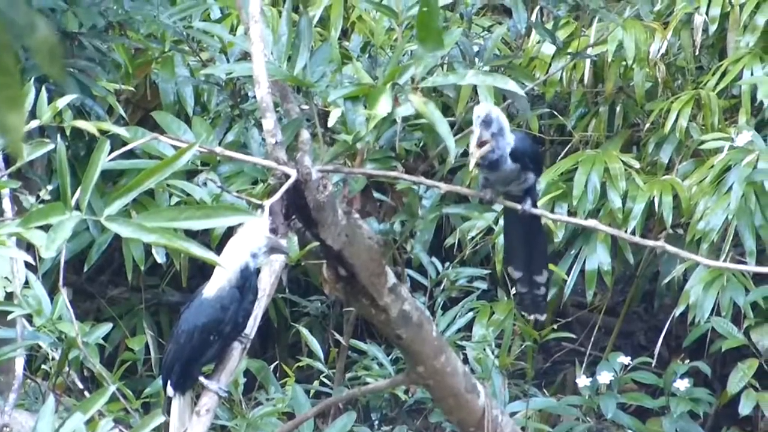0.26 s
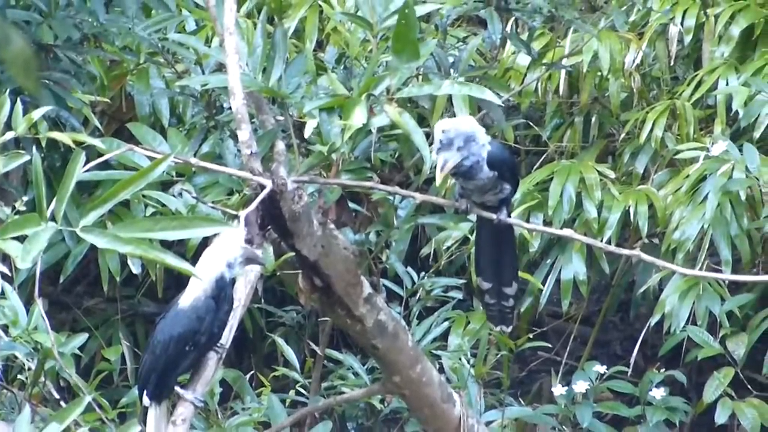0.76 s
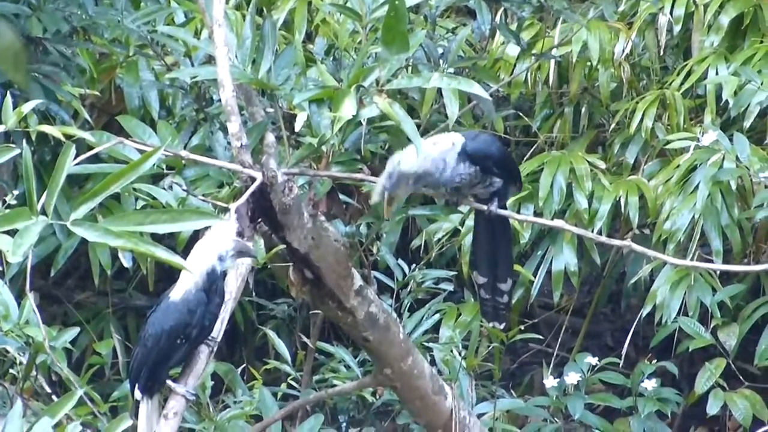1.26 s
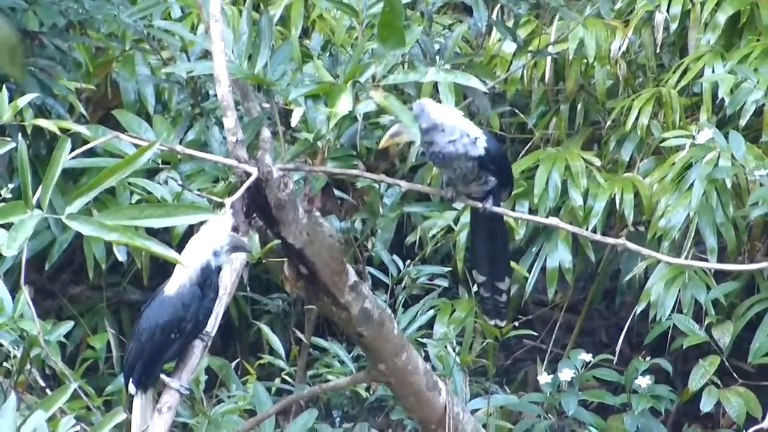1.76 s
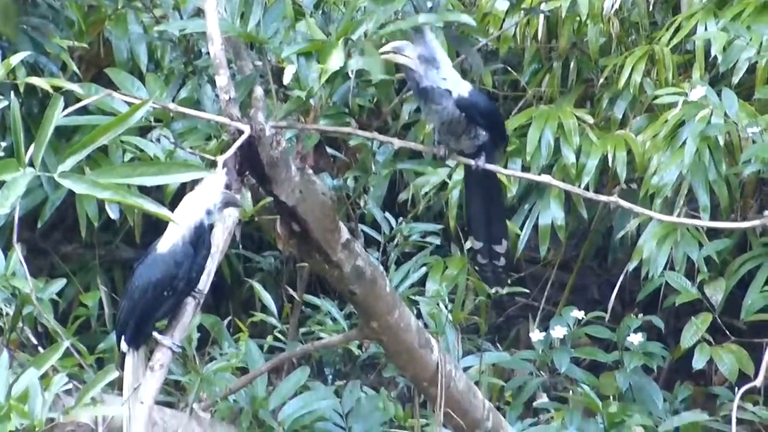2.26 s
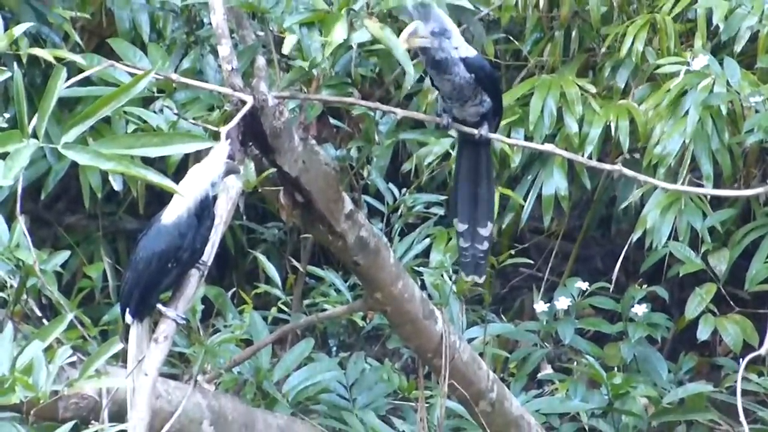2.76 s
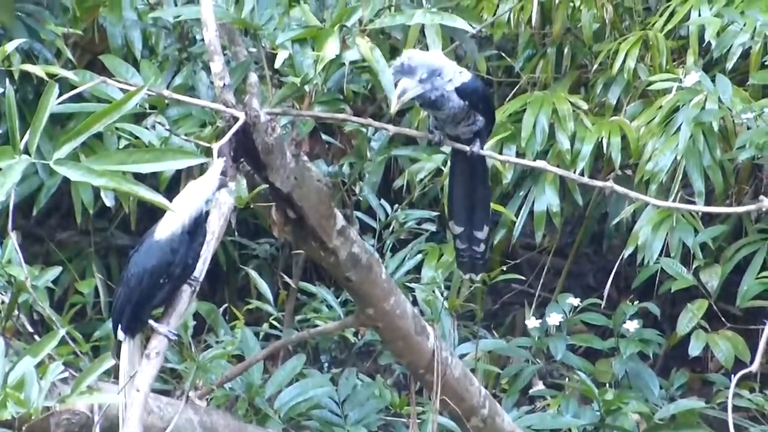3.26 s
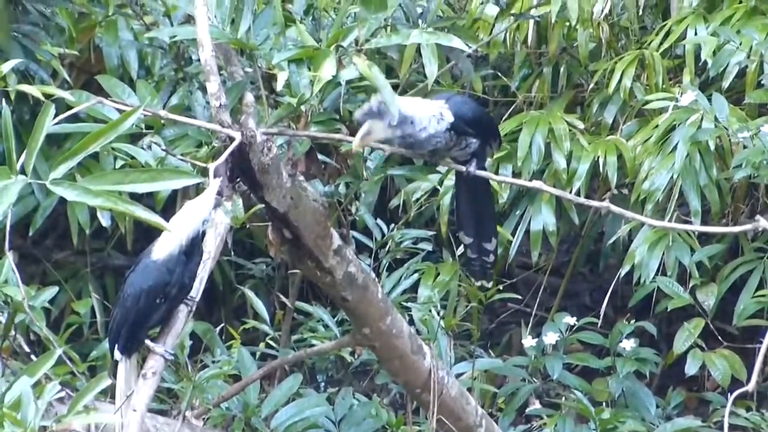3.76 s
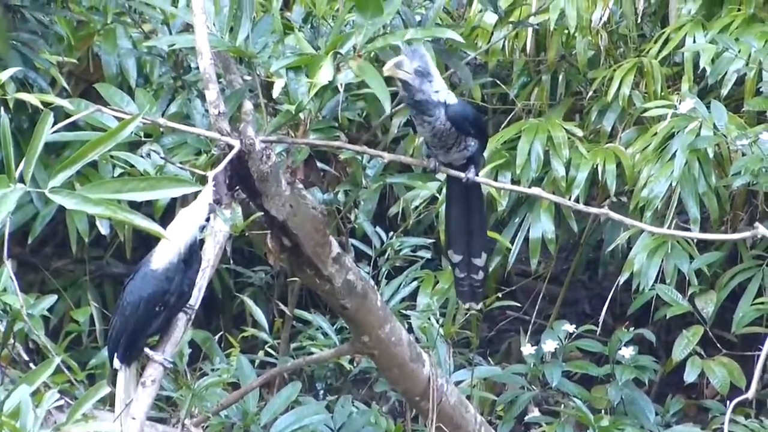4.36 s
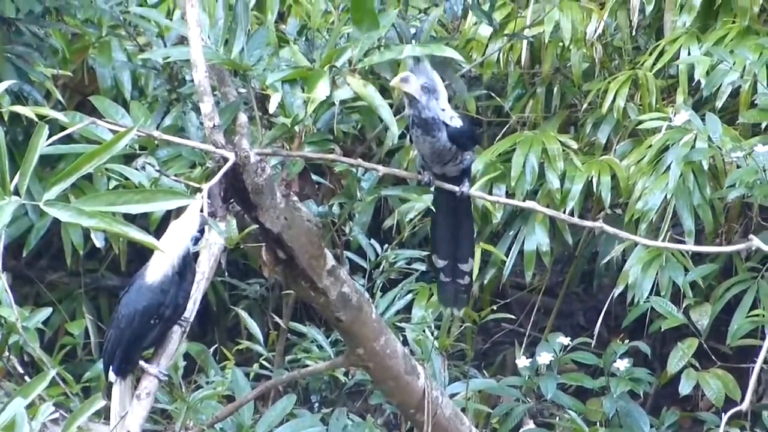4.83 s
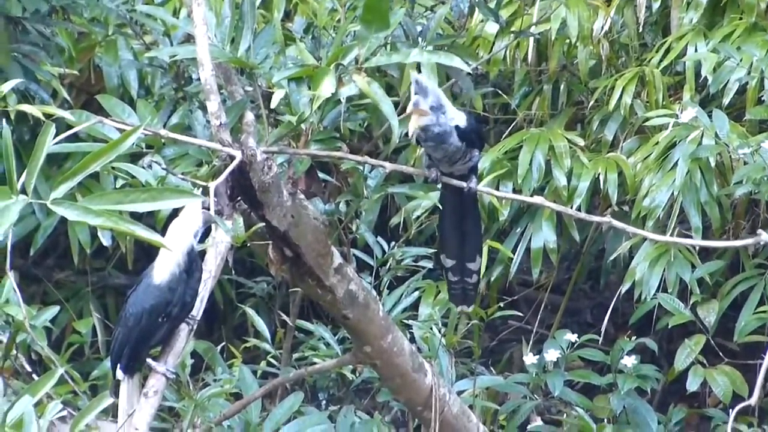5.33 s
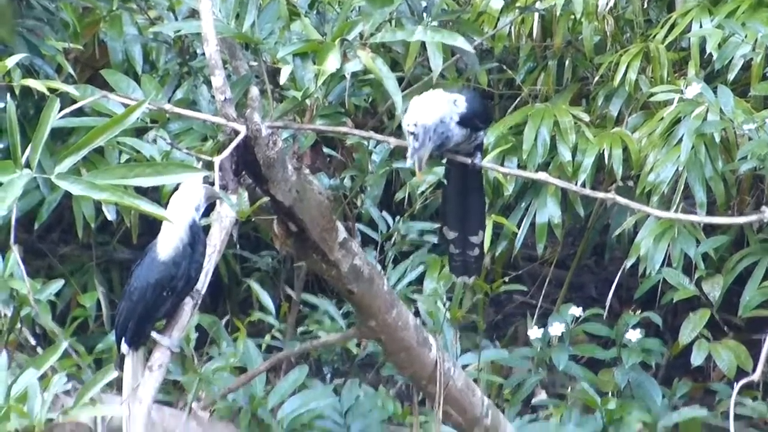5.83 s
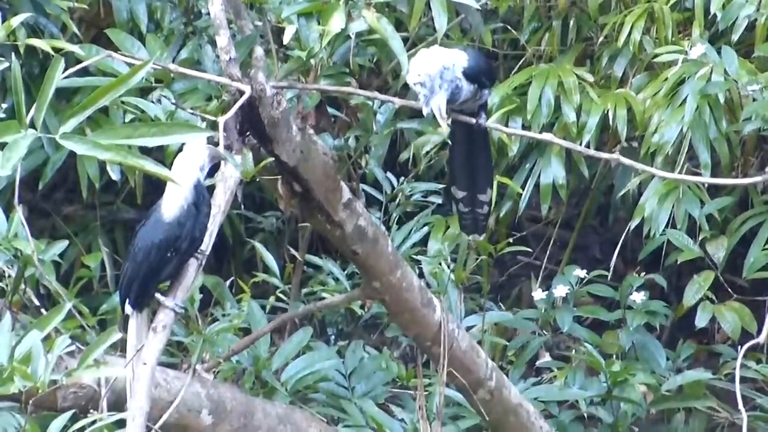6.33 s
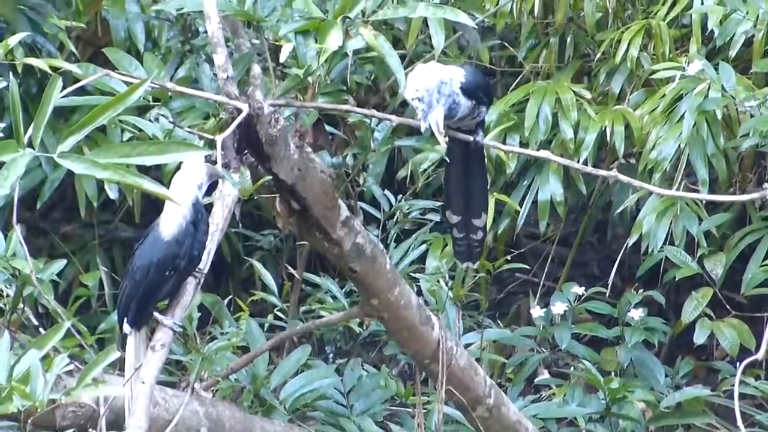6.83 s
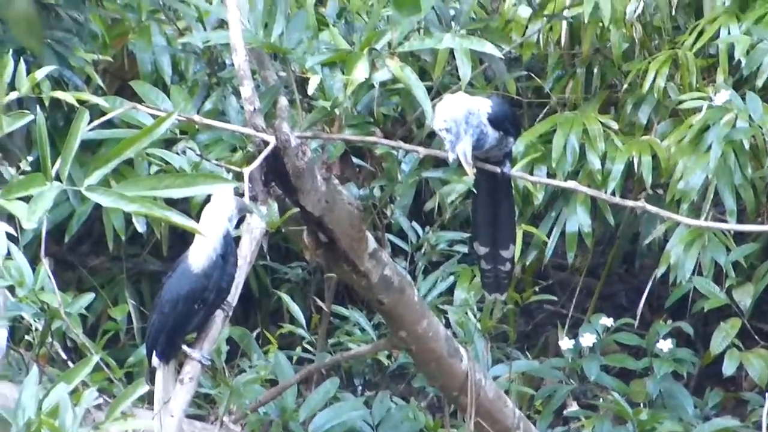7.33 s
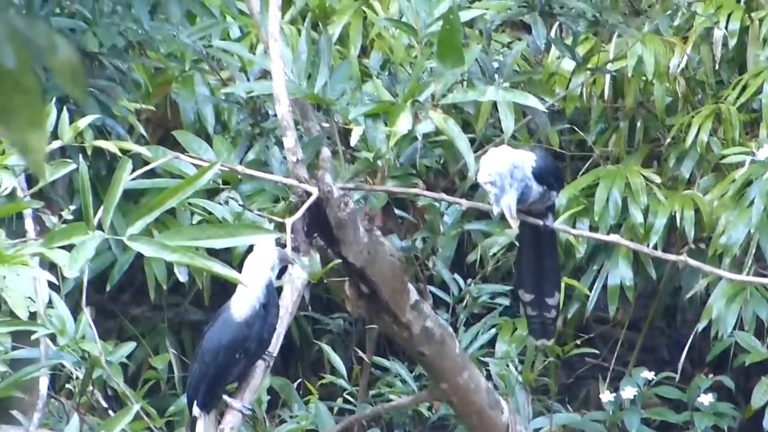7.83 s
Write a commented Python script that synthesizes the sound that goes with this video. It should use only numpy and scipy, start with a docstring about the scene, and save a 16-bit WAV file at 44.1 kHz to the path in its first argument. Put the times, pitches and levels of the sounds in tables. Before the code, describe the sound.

Wavering high cicada tones and dry buzzing run without pause, with short plunging bird chirps in pairs over soft low air.

```python
"""Cicadas whine on wavering tones near 5.6 kHz in a rainforest by day, a few near the microphones, more further off.
Two others buzz: paired tymbals click in turn and ring the abdomen near 9.5 kHz. A katydid throbs in filtered noise.
Countless far insects are shaped noise, a hiss in which one group swells. A bird drops quick falling
chirps, gliding tones that echo among the trees. Under it all lies shaped noise: soft low air and a faint, hollow rush."""
import sys
import numpy as np
from scipy import signal
from scipy.fft import rfft, irfft, next_fast_len
from scipy.io import wavfile
from scipy.ndimage import uniform_filter1d

SR = 44100
rng = np.random.default_rng(int(sys.argv[2]) if len(sys.argv) > 2 else 0)


def to_wav(s):
    """Save 16-bit WAV."""
    ch = np.atleast_2d(s).T  # columns
    pcm = np.round(np.clip(ch, -1, 1) * 32767)  # PCM
    wavfile.write(sys.argv[1], SR, pcm.astype(np.int16))


N = 356769
TIME = np.arange(N) / SR  # s


def undb(db):
    """Decibels to gain."""
    return 10 ** (np.asarray(db) / 20)


def level(x, db):
    """Set the rms level."""
    return x * undb(db) / np.sqrt(np.mean(x ** 2))


def curves(table):
    """The columns of a table, joined by straight lines in time."""
    t, *columns = np.transpose(table)
    return [np.interp(TIME, t, column) for column in columns]


def ramp(start_s, length_s):
    """An even rise from 0 to 1."""
    return np.clip((TIME - start_s) / length_s, 0, 1)


def walk(rate):
    """Smooth chance with a spread near 1, from `rate` random steps per second."""
    k = int(SR / rate)
    steps = np.repeat(rng.standard_normal(N // k + 1), k)
    smooth = uniform_filter1d(uniform_filter1d(steps, k), k)
    return 1.3 * smooth[:N]


def colour(x, points):
    """Filter by a spectrum of (f/Hz, level/dB) points that falls 90 dB per octave beyond both ends."""
    hz, db = np.transpose(points)
    size = next_fast_len(N)
    f = np.fft.rfftfreq(size, 1 / SR) + 1  # 1 Hz up, to keep the logarithm finite
    octaves_beyond = np.maximum(np.log2(f / hz[-1]), 0) + np.maximum(np.log2(hz[0] / f), 0)
    gain = undb(np.interp(np.log(f), np.log(hz), db) - 90 * octaves_beyond)
    return irfft(rfft(x, size) * gain, size)[..., :N]


def pan(x, db):
    """Tip a sound towards the left by db, left against right."""
    return x * undb(np.array([[db], [-db]]) / 2)


def stereo_noise(size, side_db):
    """Noise shared by both ears plus a part that is opposite in them."""
    mid, side = rng.standard_normal((2, size))
    return mid + undb(side_db) * side * np.array([[1], [-1]])


def trees(x, t60, side_db, delay=0.018):
    """Diffuse echo from trunks and leaves, with unit gain: it builds up over `delay` s, then dies away."""
    t = TIME[:SR // 2]
    build_up = 1 - np.exp(-(t / delay) ** 2)
    tail = stereo_noise(len(t), side_db) * undb(-60 * t / t60) * build_up
    tail /= np.sqrt(np.sum(tail ** 2) / 2)
    return signal.fftconvolve(x[None], tail, axes=1)[:, :len(x)]


def whine(hz, db, vibrato, depth_hz, echo_rms_db, drift=0.057):
    """One cicada's ringing tone: it swings in pitch and level and beats against its own echo."""
    swing = np.cos(2 * np.pi * (vibrato * TIME + drift * walk(1.53)))
    pitch = hz + depth_hz * swing + 4 * walk(70)
    tone = np.sin(2 * np.pi * np.cumsum(pitch) / SR)
    tone = tone * undb(.7 * swing + .7 * walk(5))
    echo = level(trees(tone, t60=0.42, side_db=-15), echo_rms_db)
    return level(tone + echo, 0) * undb(db)


# nearest whining cicada: (t/s, f/Hz, level/dB before the pan)
NEAREST_WHINER = [(0, 5598, -35.5), (.8, 5602, -33), (1.8, 5597, -34), (3.1, 5600, -33), (5.2, 5606, -35),
                  (6.6, 5614, -32), (7.1, 5580, -36), (8.1, 5600, -39.5)]
# its lower neighbour creeps up in pitch and grows louder as it warms to its song
NEIGHBOUR_HZ, NEIGHBOUR_RISE_HZ_PER_S = 5436, 9.5
NEIGHBOUR_DB, NEIGHBOUR_RISE_DB_PER_S = -44.5, 0.91
# a cicada that joins in, climbs towards the others and sinks in level: (t/s, f/Hz, level/dB before the pan)
JOINING_WHINER = [(1.9, 5345, -65), (2.6, 5328, -52), (3.4, 5350, -47), (4.1, 5420, -45), (8.1, 5500, -53)]
# whiners further off, each swelling and sinking:
# (mean f/Hz, mean level/dB before the pan, vibrato/Hz, vibrato depth/Hz, swell/dB)
FAR_WHINERS = [(5778, -48.5, 8.3, 13, .5), (5632, -45, 6.6, 16, 1), (5525, -43, 7.7, 26, 1),
               (5130, -60, 6.9, 28, 1.5), (5210, -60, 7.5, 28, 1.5), (5295, -60, 6.2, 28, 1.5)]
# spectrum of the most distant whiners, blurred together: (f/Hz, relative level/dB)
WHINE_BLUR = [(4400, -58), (4900, -27.5), (5150, -1.5), (5350, -4), (5480, 6), (5620, 3.5), (5700, -4),
              (5950, -24), (6400, -16)]


def whiners(blur_db=-41):
    """Three near cicadas and a few further off sing as tones; the blur of the rest is band-shaped noise."""
    out = whine(*curves(NEAREST_WHINER), vibrato=7.08, depth_hz=17, echo_rms_db=-9.5)
    neighbour_hz = NEIGHBOUR_HZ + NEIGHBOUR_RISE_HZ_PER_S * TIME
    neighbour_db = NEIGHBOUR_DB + NEIGHBOUR_RISE_DB_PER_S * TIME
    out += whine(neighbour_hz, neighbour_db, vibrato=7.3, depth_hz=18, echo_rms_db=-5.5)
    out += whine(*curves(JOINING_WHINER), vibrato=6.5, depth_hz=11, echo_rms_db=-8.5)
    for hz, db, vibrato, depth_hz, swell_db in FAR_WHINERS:
        wandering_hz = hz + 7 * walk(.7)
        swelling_db = db + swell_db * walk(0.94)
        # far off, the echo outweighs the direct tone
        out += whine(wandering_hz, swelling_db, vibrato, depth_hz, echo_rms_db=2.0)
    out += level(colour(stereo_noise(N, side_db=1.5), WHINE_BLUR), blur_db)
    return pan(out, -3.0)


def clicks(phase):
    """One click at each whole turn, shared between neighbouring samples."""
    at = np.flatnonzero(np.diff(np.floor(phase)) > 0)
    late = (np.floor(phase[at + 1]) - phase[at]) / (phase[at + 1] - phase[at])
    out = np.zeros(N)
    out[at], out[at + 1] = 1 - late, late
    return out


# buzzing cicadas: (clicks of both tymbals/Hz, level/dB before the pan,
# second tymbal against the first/dB, its place in the cycle 0-1, left minus right/dB)
BUZZERS = [(327.7, -36.5, -3, .47, -3.5), (336.7, -40.5, 0, .5, -2.5)]
# ring of each buzzer's abdomen: (f/Hz, relative level/dB)
ABDOMENS = [
    [(7600, -15), (8400, -6.5), (8700, -2), (9200, 1.5), (9800, -1.5), (10300, -10), (11500, -22)],
    [(7600, -18), (8800, -17), (9500, -3), (10400, -2), (11100, -10), (11450, -18), (11800, -35)],
]


def buzzers(echo_db=2):
    """Two tymbals buckle in turn and ring the abdomen; their pace quivers a little."""
    out = 0
    for (rate, db, second_db, place, pan_db), abdomen in zip(BUZZERS, ABDOMENS):
        quiver = .0015 * walk(30) + .0018 * walk(250)
        phase = np.cumsum(rate / 2 * (1 + quiver)) / SR  # each tymbal clicks once a turn
        both_tymbals = clicks(phase) + undb(second_db) * clicks(phase + place)
        buzz = colour(both_tymbals, abdomen)
        echo = undb(echo_db) * trees(buzz, t60=0.69, side_db=-12.0)
        out = out + pan(level(buzz + echo, db), pan_db)
    return out


# spectrum of the katydid's rasp: (f/Hz, relative level/dB)
KATYDID_BODY = [(6000, -47), (6550, -10), (6850, 3.5), (7350, 1.5), (8000, -10.5), (12700, -32),
                (13500, -11), (14400, -21), (15600, -45)]


def katydid(db=-46.5):
    """Nineteen rasps a second left of the microphones, each of three short wing strokes."""
    rate, spacing_s, stroke_s = 19.0, .0117, .004  # stroke_s: from the peak of a stroke to 1/e
    since = ((rate * TIME + 0.082 * walk(1)) % 1) / rate  # s into the rasp
    strokes = sum(np.exp(-((since - (k + 1) * spacing_s) / stroke_s) ** 2) for k in range(3))
    rasp = level(colour(rng.standard_normal(N) * strokes, KATYDID_BODY), db)
    return pan(rasp * undb(2.0 * walk(0.75)), 2.8)


# far insect hiss: (f/Hz, relative level/dB)
HISS = [(5900, -19.5), (6150, -18), (6750, -4.5), (7400, -10.5), (7900, -15), (8500, -8), (9100, 0.5),
        (9700, 0.5), (10600, -7), (11400, -14.5), (12700, -30), (13600, -21), (14700, -19), (15800, -48)]
# spectrum of a far group that swells: (f/Hz, relative level/dB)
SWELL_BAND = [(6500, -12), (7300, -4.5), (7900, -1.5), (8400, -3), (9500, -5)]
# a faint band of noise near 3.7 kHz that rises together with the group:
# (f/Hz, relative level/dB), and its level against the group
FAINT_BAND = [(3300, -16), (3750, 0), (4300, -11)]
FAINT_BAND_DB = -19
# the group swells from one level to another and stays
SWELL_START_S, SWELL_RISE_S, SWELL_FROM_DB, SWELL_TO_DB = 2.8, 2.5, -61, -39.5


def far_chorus(hiss_db=-32.0):
    """Distant insects merge into a hiss of shaped noise; one group swells and stays, a faint band with it."""
    hiss = level(colour(stereo_noise(N, side_db=-6), HISS), hiss_db)
    hiss = hiss * undb(0.14 * walk(2.1))
    swell_db = SWELL_FROM_DB + (SWELL_TO_DB - SWELL_FROM_DB) * ramp(SWELL_START_S, SWELL_RISE_S)
    noise = stereo_noise(N, side_db=-15)
    group = level(colour(noise, SWELL_BAND), 0)
    faint_band = level(colour(noise, FAINT_BAND), FAINT_BAND_DB)
    return pan(hiss + (group + faint_band) * undb(swell_db), -0.67)


def bell(x, width):
    """A smooth hump of height 1 that falls to 1/e at `width`."""
    return np.exp(-(x / width) ** 2)


# every chirp has one shape: a held high note, a plunge, a low closing note
KNEE_HZ, FALL_S, BEND = 4776, 0.037, 1.4  # the plunge: where it starts, its length, its curve
SAG = 0.03825  # share of the pitch lost per FALL_S, all along the chirp
HIGH_S, LOW_S = 0.01, 0.012  # from the peak of the high and of the low note to 1/e
HIGH_OCTAVES = 0.16  # the high note is down to 1/e once the pitch has dropped this far
PLUNGE_HZ, PLUNGE_OCTAVES = 3600, 0.43  # pitch the plunge favours, and how far from it the gain is 1/e
ECHO_DB_PER_OCTAVE = 20  # the further a plunge falls beyond an octave, the more of it comes back as echo


def chirp(t, end_hz, high_db, plunge_db, low_db, rough=0.0295, flutter_db=3.5, lead_s=0.0023):
    """A held high note that plunges and levels out; returns what reaches the trees and what comes directly."""
    u = t / FALL_S  # 0 at the start of the plunge, 1 at its end
    fall = np.clip(1 - u, 0, 1) ** BEND
    pitch = end_hz * (KNEE_HZ / end_hz) ** fall * (1 - SAG * u)

    high = undb(high_db) * bell(t + lead_s, HIGH_S) * bell(np.log2(pitch / KNEE_HZ), HIGH_OCTAVES)
    falling = np.sqrt(np.clip(np.sin(np.pi * np.clip(u, 0, 1)), 0, 1))
    plunge = undb(plunge_db) * falling * bell(np.log2(pitch / PLUNGE_HZ), PLUNGE_OCTAVES)
    low = undb(low_db) * bell(t - FALL_S, LOW_S)

    # the level flutters and the pitch is rough
    flutter, jitter = (level(uniform_filter1d(rng.standard_normal(len(t)), size=110), 0) for _ in range(2))
    phase = 2 * np.pi * np.cumsum(pitch * (1 + rough * jitter)) / SR
    tone = np.sqrt(2) * np.sin(phase) * undb(flutter_db * flutter)
    echo_gain = undb(ECHO_DB_PER_OCTAVE * (np.log2(KNEE_HZ / end_hz) - 1))
    return tone * (high + echo_gain * plunge + low), tone * (high + plunge + low)


# bird chirps: (start of the plunge t/s, end f/Hz before the sag,
# then level/dB of high note, plunge and low note, before shaping and the gains of the paths)
CHIRPS = [(-0.008, 2800, -44, -45, -63), (0.259, 2000, -35.5, -68, -53.5), (0.397, 1790, -38, -74, -49),
          (0.712, 2910, -40, -45, -68), (0.854, 1750, -45, -72, -52), (1.184, 1670, -51, -42.5, -57),
          (1.320, 1700, -38, -45, -59), (1.461, 1590, -37, -50, -58), (1.665, 1650, -62, -49, -61),
          (1.797, 1660, -62, -48, -56), (2.007, 1830, -62, -70, -48.5), (2.158, 1635, -56, -66, -49),
          (2.448, 1600, -62, -70, -47), (2.588, 1765, -36.5, -70, -48.5), (2.819, 1794, -49, -68, -44),
          (3.200, 1613, -41, -68, -42.5), (3.358, 1600, -42, -51, -44.5), (3.646, 1680, -50, -42.5, -53),
          (3.781, 1450, -49, -48, -50), (4.029, 1610, -48, -56.5, -45), (4.153, 1607, -52, -62, -45.5),
          (4.505, 1836, -40, -55, -45), (4.646, 1780, -38, -72, -42), (5.009, 1560, -44, -70, -44.5),
          (5.136, 1660, -46, -54.5, -48), (5.537, 1750, -35, -51.5, -51), (6.272, 2450, -55, -52, -55),
          (6.407, 2370, -47, -38.5, -55), (6.599, 2380, -41, -36.5, -49), (6.959, 2580, -62, -40.5, -56),
          (7.822, 2700, -58, -55, -70), (7.981, 2700, -54, -54, -58)]
# bands in which a chirp lingers among the trunks: (f/Hz, width/Hz, level/dB)
LINGERS = [(1720, 300, -18), (2380, 180, 0), (3520, 280, 4), (4700, 300, -15)]


def bird(call_db=-2, blur_db=-9, scatter_db=-6.0, dull_hz=3400):
    """Each chirp is blurred by near leaves and scattered by the trees; a few narrow bands of it linger."""
    t = TIME[:SR // 5] - .05
    song = np.zeros((2, N + 2 * SR))  # a second to spare at each end
    for plunge_s, *shape in CHIRPS:
        start = int((plunge_s + t[0] + 1) * SR)
        song[:, start:start + len(t)] += chirp(t, *shape)
    to_trees, direct = song[:, SR:SR + N]
    near_blur = trees(direct, t60=0.062, side_db=-16, delay=0.00083)
    out = undb(call_db) * direct + undb(blur_db) * near_blur

    # leaves soak up the highest part, so the scatter is duller
    dull = signal.sosfilt(signal.butter(4, dull_hz, fs=SR, output="sos"), to_trees)
    out += undb(scatter_db) * trees(dull, t60=0.43, side_db=-28, delay=0.01)

    lingering = np.zeros(N)
    for hz, width, db in LINGERS:
        edges = [hz - width / 2, hz + width / 2]
        band = signal.butter(3, edges, "band", fs=SR, output="sos")
        lingering += undb(db) * signal.sosfilt(band, to_trees)
    return out + trees(lingering, t60=0.62, side_db=-15, delay=0.0076)


# soft low air noise, with a hollow resonance near 690 Hz: (f/Hz, relative level/dB)
AIR_NOISE = [(25, -7.5), (80, -11), (105, -2.5), (130, -4.5), (210, -0.5), (330, -3), (600, 2), (690, 10.5),
             (950, 1.5), (1900, -1.5), (3050, -6.5), (3700, 1.5), (4300, 0.5), (5200, 7)]
# the air noise starts softer by AIR_RISE_DB and comes up to its level
AIR_DB, AIR_RISE_S, AIR_RISE_DB = -49, 2.1, 2.5
# hollow rush: (f/Hz, relative level/dB)
RUSH = [(25, -15), (100, -13), (200, -9), (400, -12.5), (950, -13), (1500, -13.5), (2200, -18.5),
        (4000, -30)]
RUSH_DB = -51.5
# resonances added to the rush: (f/Hz, width/Hz, level/dB)
HOLLOWS = [(452, 50, 28), (586, 65, 26), (696, 68, 23.4), (852, 37, 5.6)]


def air():
    """Soft low air as shaped noise, and a wide rush, opposite in the two ears, with hollow resonances."""
    soft_air = level(colour(stereo_noise(N, side_db=-34), AIR_NOISE), AIR_DB)
    soft_air = soft_air * undb(.5 * walk(2.03) + AIR_RISE_DB * (ramp(0, AIR_RISE_S) - 1))
    noise = colour(rng.standard_normal(N), RUSH)
    rush = noise.copy()
    for hz, width, db in HOLLOWS:
        rush += undb(db) * signal.lfilter(*signal.iirpeak(hz, hz / width, SR), noise)
    return soft_air + level(rush, RUSH_DB) * np.array([[1], [-1]])


def scene():
    """All the voices of the forest."""
    return whiners() + buzzers() + katydid() + far_chorus() + bird() + air()


TOP_HZ = 15700


def record(dry):
    """The camera cuts the top: a steep low-pass on both microphone channels."""
    return signal.sosfilt(signal.ellip(10, .2, 80, TOP_HZ, fs=SR, output="sos"), dry)


dry = scene()
out = record(dry)
to_wav(out)
```